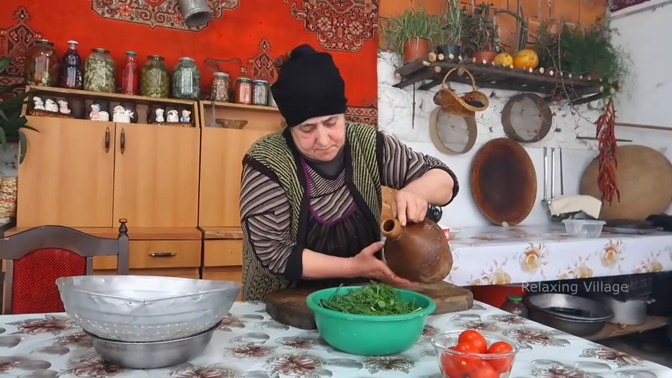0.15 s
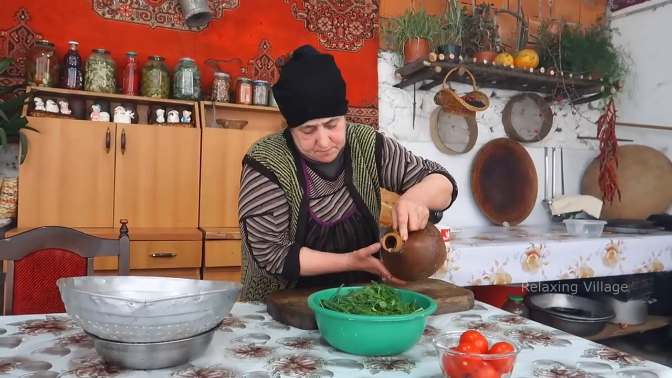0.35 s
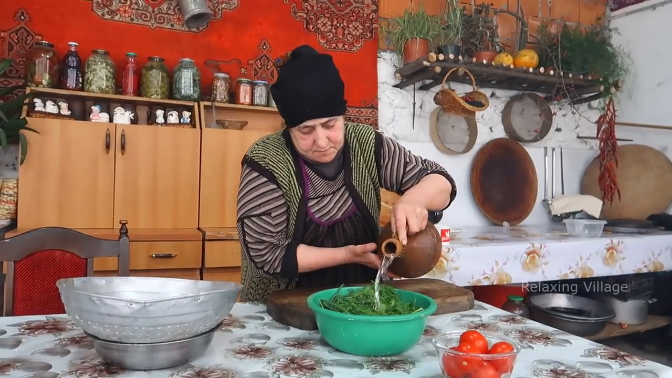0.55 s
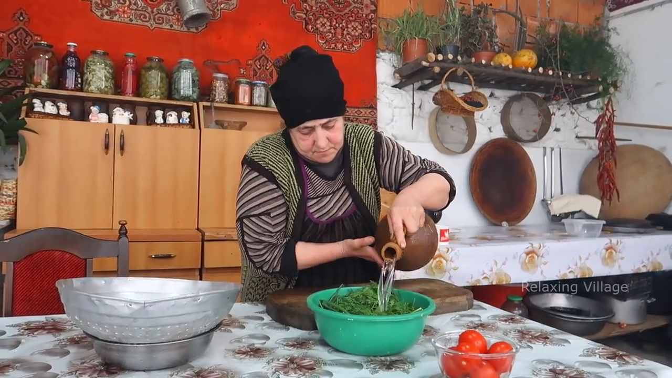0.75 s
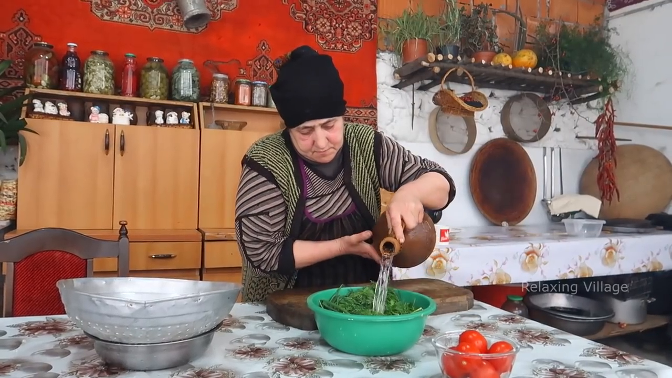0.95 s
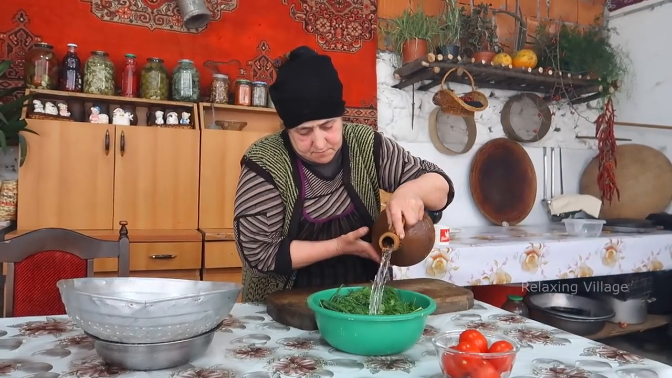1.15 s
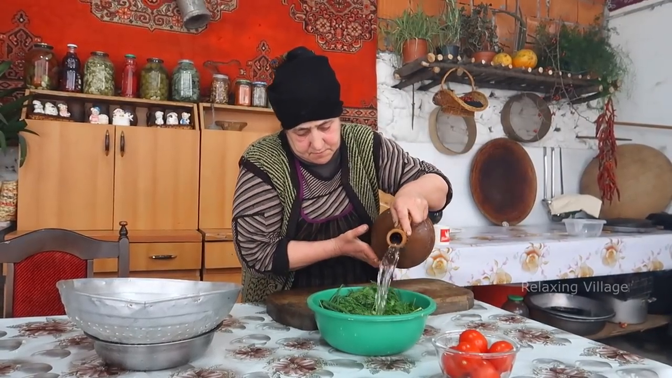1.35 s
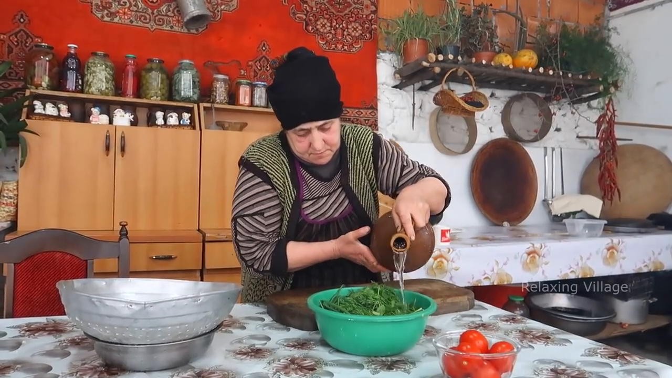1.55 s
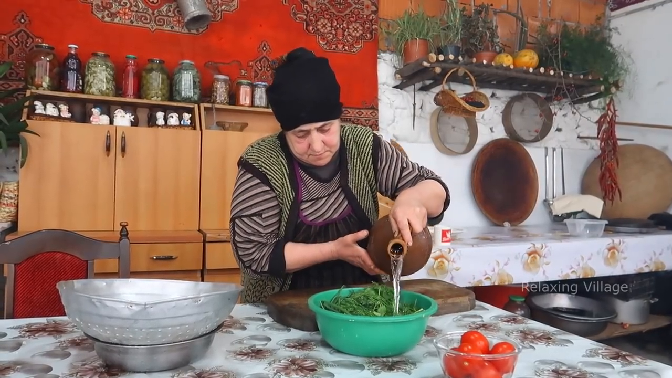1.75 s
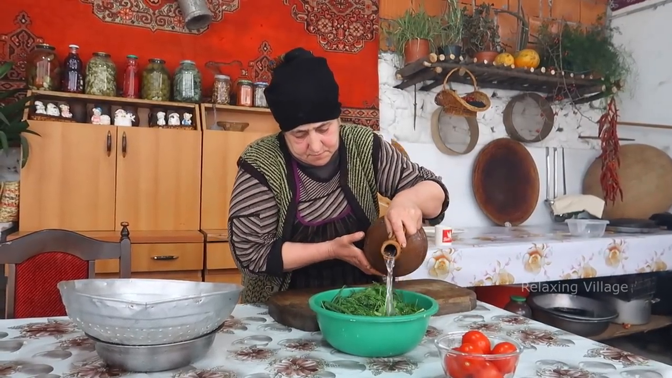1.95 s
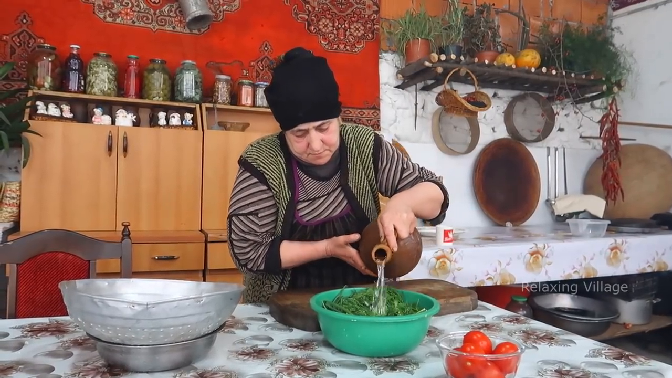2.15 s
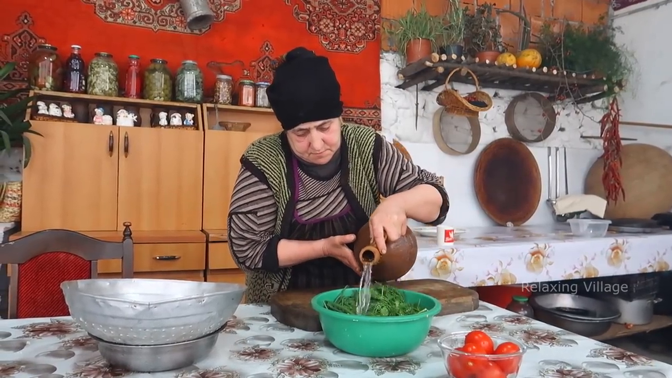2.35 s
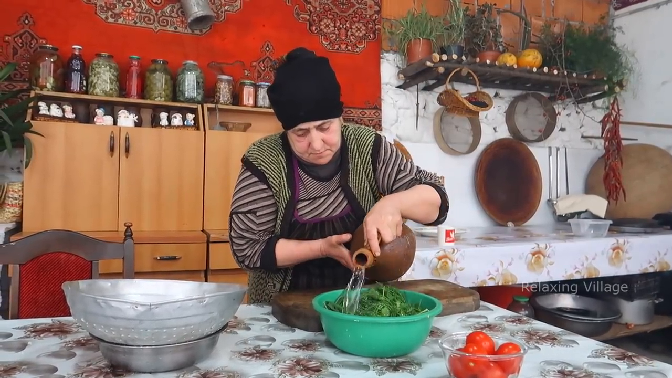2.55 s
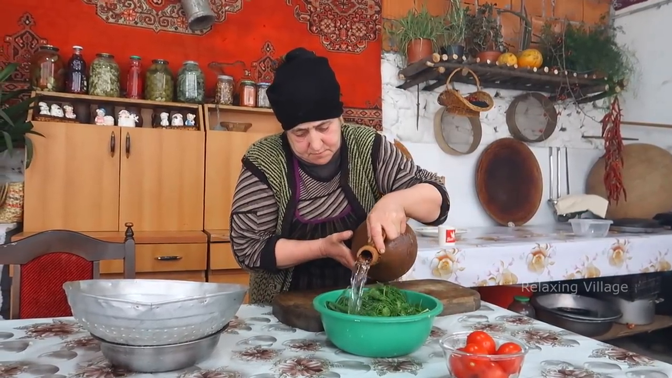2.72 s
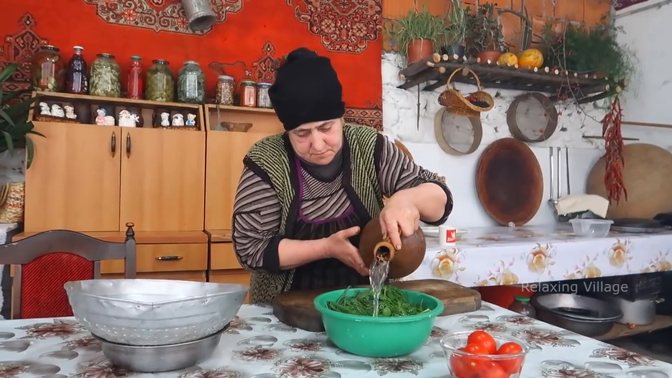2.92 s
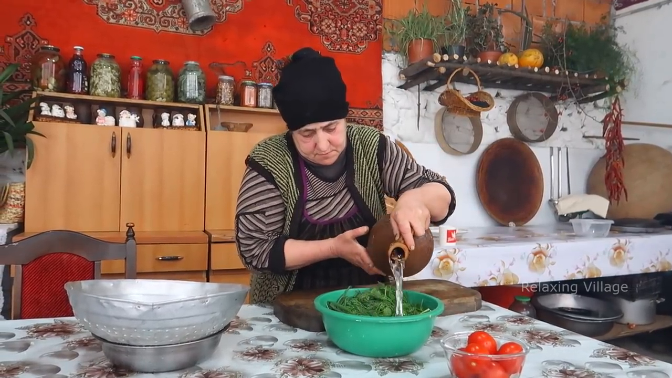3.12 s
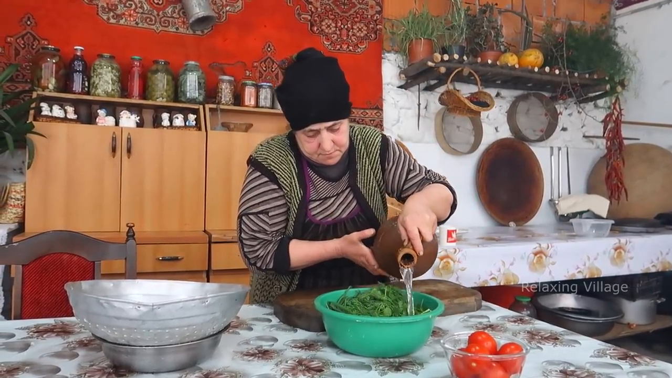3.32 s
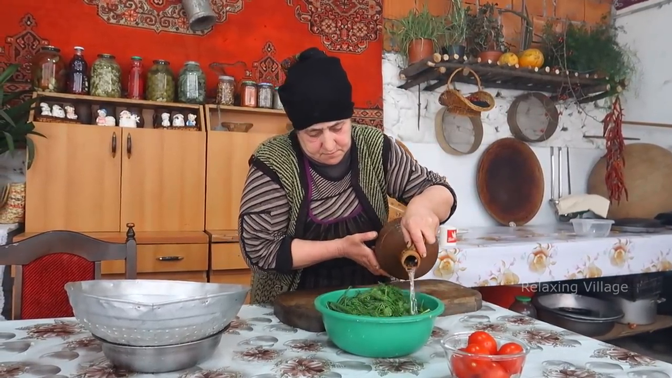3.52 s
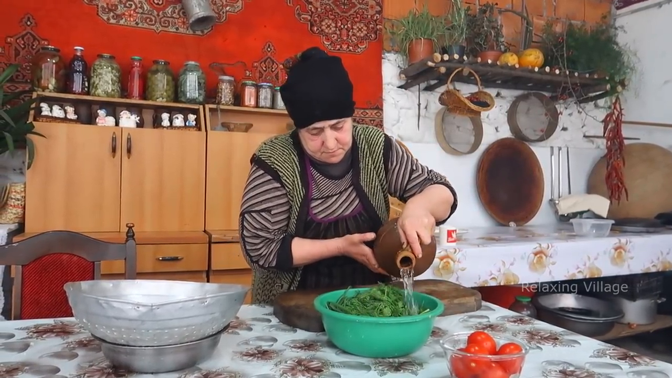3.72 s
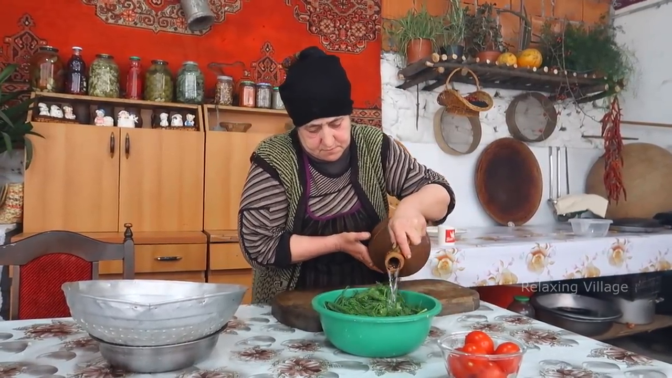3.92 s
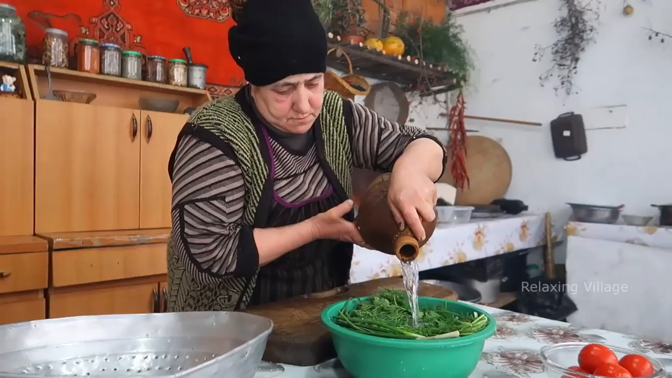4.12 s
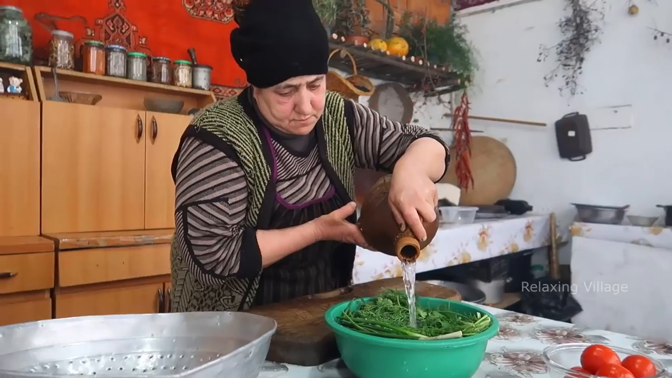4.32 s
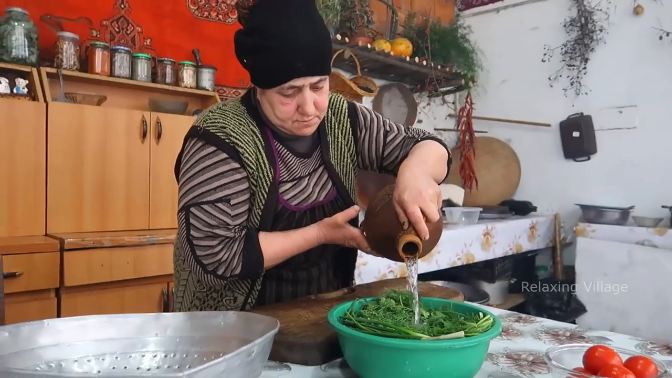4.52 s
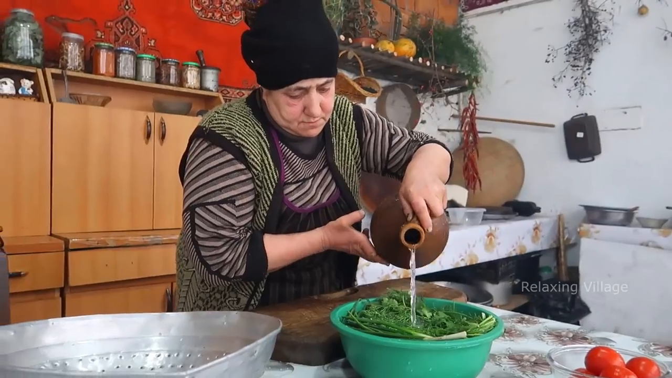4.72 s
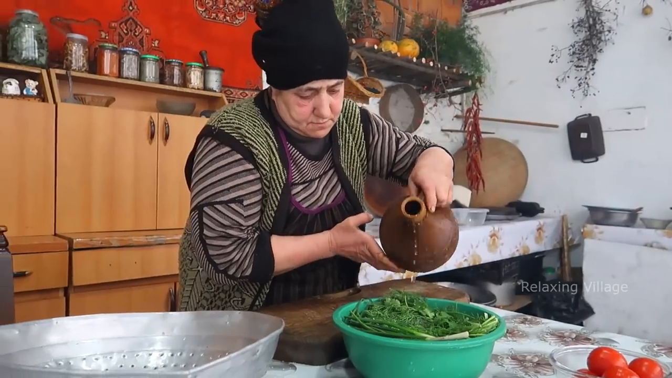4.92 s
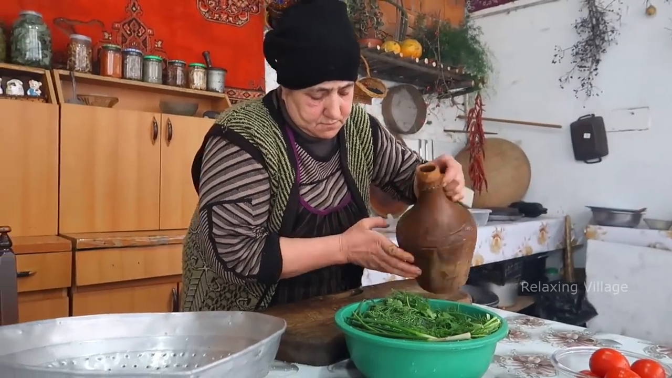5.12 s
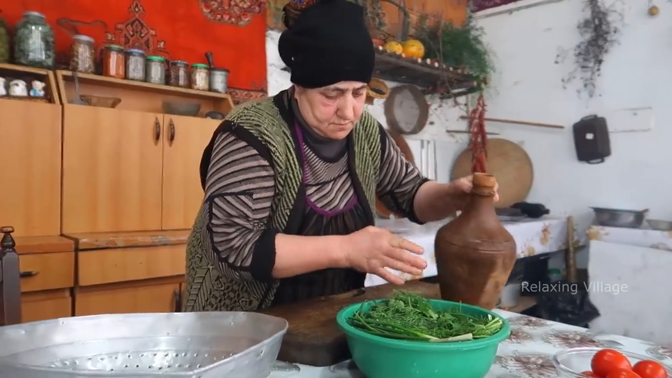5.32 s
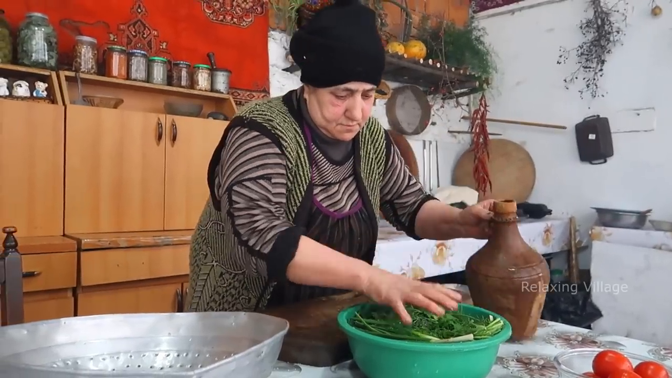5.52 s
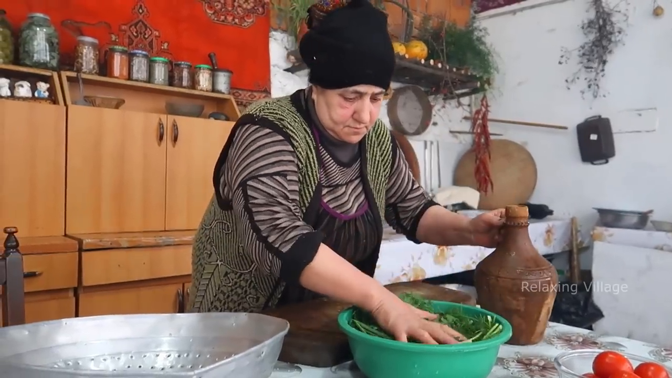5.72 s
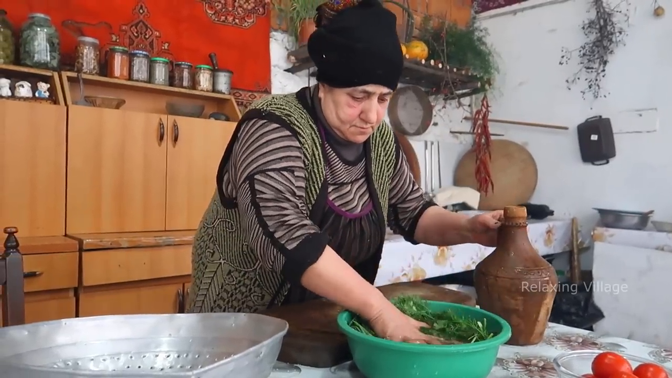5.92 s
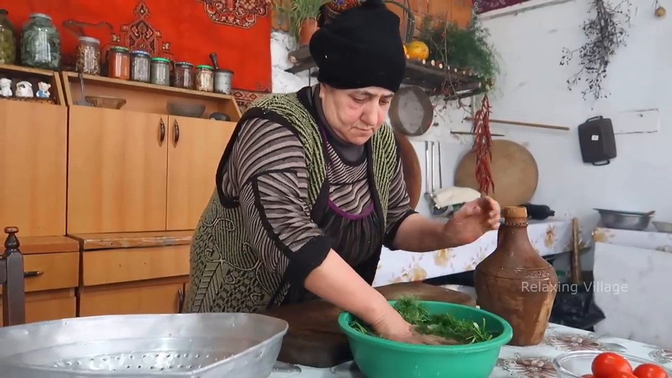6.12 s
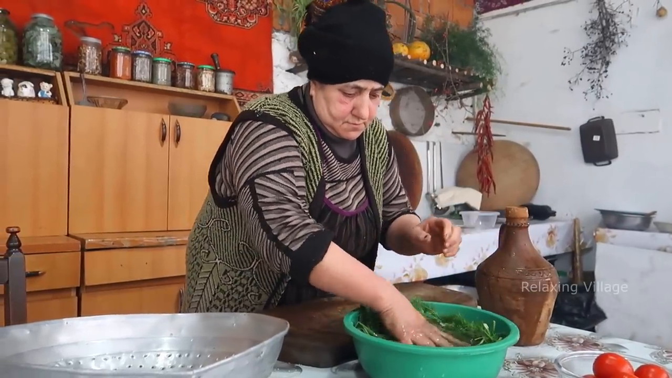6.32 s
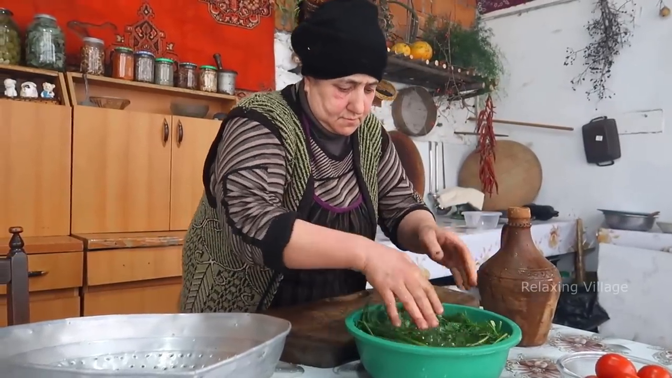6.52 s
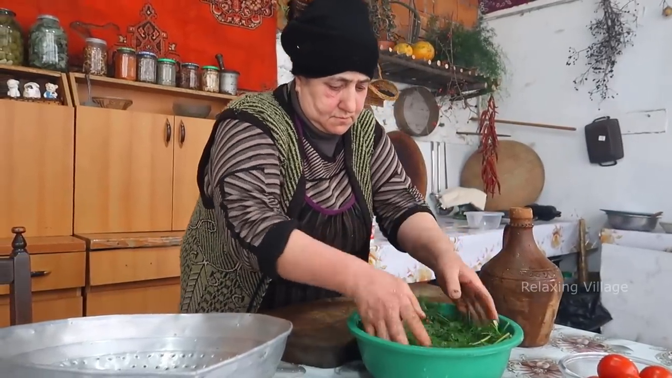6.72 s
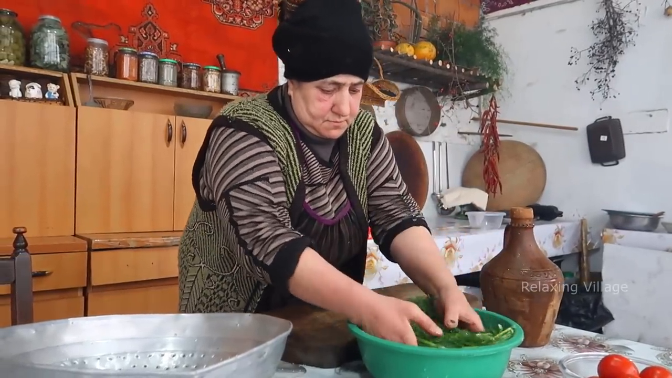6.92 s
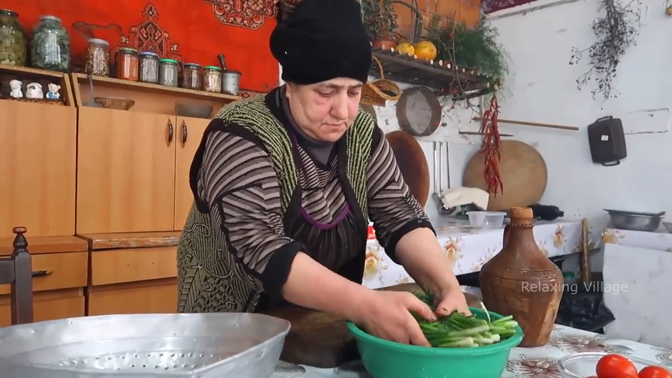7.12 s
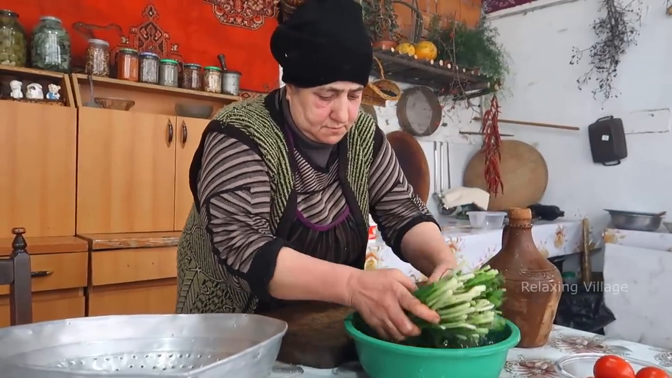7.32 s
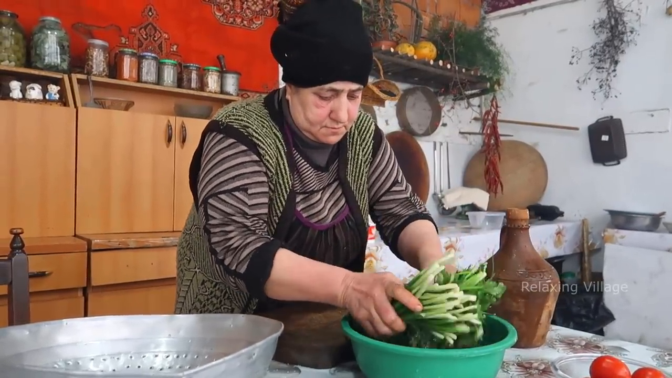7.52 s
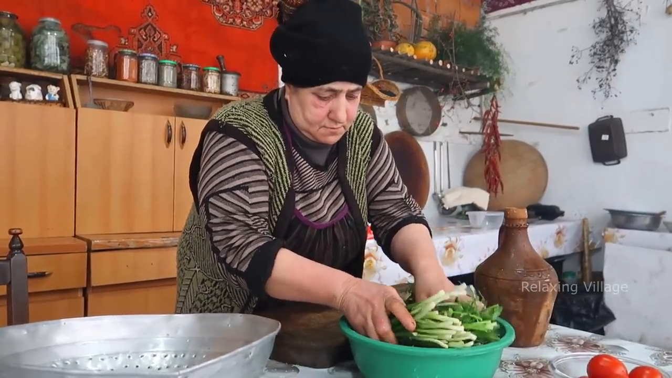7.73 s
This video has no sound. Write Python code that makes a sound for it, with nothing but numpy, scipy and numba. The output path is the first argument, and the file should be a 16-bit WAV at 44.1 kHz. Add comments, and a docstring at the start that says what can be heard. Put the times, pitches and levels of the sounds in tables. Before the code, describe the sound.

Over quiet room hiss, trapped air glugs about five times a second in a clay jug, with hollow pops strongest early and deeper booms later, while water patters on leaves. After a lull of small drips, one very loud thud of clay on a wooden table rocks and chatters. The level ducks, then wet rustles, dull bowl knocks, sloshing and a final burst of drops follow, closely miked.

```python
"""A faint pop in a jug's neck over kitchen hiss, then water glugs from clay onto greens in a plastic bowl.
Gulped air resonates in the belly, gurgles in the neck and pops as water films burst: damped oscillators.
Spurts and splashes are flurries of tiny bubble tones on the leaves. The jug lands hard on the table as
struck modes, then hands dunk the greens and lift them out streaming, as swelling drop clouds and noise.
Short room tails surround all sources, and loud moments push the overall level down for a while."""
import sys
import numpy as np
from scipy import signal
from scipy.fft import rfft, irfft, next_fast_len
from scipy.io import wavfile
from numba import njit

SR = 44100
rng = np.random.default_rng(int(sys.argv[2]) if len(sys.argv) > 2 else 0)


def log_audio(samples):
    """Write samples as a 16-bit WAV file to the path given in sys.argv[1]."""
    # one column per channel
    frames = np.atleast_2d(samples).T
    # limit to full scale, then quantise
    limited = np.clip(frames, -1, 1)
    pcm = np.round(limited * 32767).astype(np.int16)
    wavfile.write(sys.argv[1], SR, pcm)


N = 346626
T = np.arange(N) / SR

# Levels in the tables are relative: the functions set the final gain of each layer.
# air gulps entering the jug: start_s, boom_db, belly_pitch_hz, boom_t60_s, gurgle_db, gurgle_pitch_hz
AIR_GULPS = [(0.555, -31.5, 216, 0.036, -44.5, 456), (0.739, -33.5, 183.4, 0.29, -42, 398),
             (.924, -32, 176, 0.2, -35.5, 474), (1.132, -29, 176, 0.058, -42.5, 457),
             (1.345, -46, 185, 0.14, -40, 421), (1.638, -30, 128, 0.067, -28.5, 465),
             (1.882, -29.5, 194, 0.064, -39, 406), (2.09, -42, 113, 0.045, -44, 546),
             (2.324, -37, 133, 0.042, -34, 391), (2.523, -25.5, 122, 0.11, -56, 485),
             (2.782, -23.5, 153, 0.055, -33, 495), (3.022, -26.5, 213, 0.021, -38, 383),
             (3.2, -25.5, 144, 0.046, -28, 471), (3.412, -24.5, 163, 0.087, -30, 463),
             (3.665, -20.5, 147.4, 0.069, -30.5, 536), (3.855, -26.5, 149, 0.016, -31.5, 583),
             (4.039, -20.5, 148, 0.053, -30.5, 694)]
# deep hums growing before a bubble breaks free: peak_s, build_up_s, level_db, final_pitch_hz
BUBBLE_SWELLS = [(.585, .04, -48, 52), (.73, .13, -49, 72), (.9, .075, -41, 72), (1.122, .08, -43.5, 66),
                 (1.36, .085, -42.5, 62), (1.636, .022, -38.5, 62), (1.885, .03, -51, 52),
                 (2.106, .022, -44, 58), (2.328, .025, -45.5, 52), (2.522, .014, -36.5, 58),
                 (2.786, .017, -41.5, 56), (3.014, .026, -43.5, 58), (3.214, .014, -39, 58),
                 (3.43, .018, -41.5, 54), (3.681, .012, -36.5, 64), (3.864, .012, -39.5, 64),
                 (4.05, .012, -37.5, 64)]
# further gurgles in the neck, many close around a gulp, most sinking in pitch:
# start_s, level_db, pitch_hz, t60_s, glide_octaves
NECK_GURGLES = [(1.268, -32, 304, 0.059, -0.58), (1.846, -36, 534, 0.17, -1.7),
                (1.992, -41, 279, 0.079, -0.61), (2.074, -39.5, 740, 0.096, -0.12),
                (2.305, -29.5, 512, 0.069, -0.4), (2.335, -35.5, 380, 0.1, 0.16),
                (3.212, -30, 526, 0.074, -0.25), (3.424, -38.5, 724, 0.12, 0.2),
                (3.682, -32, 600, 0.08, 0.0041), (3.861, -27.5, 330, 0.038, -0.69)]
# pops of bursting water films in the neck, and the strongest rebounds of the ringing air:
# start_s, level_db, pitch_hz, snap_db, swell_cycles, t60_s, rebound_db
NECK_POPS = [(0.0742, -37.5, 1545, -57, .75, 0.024, -9), (.5605, -15.5, 1590, -27, 1.15, 0.016, -11),
             (0.5747, -25, 1665, -41, 3, 0.038, -14), (.584, -26.5, 1405, -52, 1.5, 0.025, -7),
             (0.7405, -31, 1860, -49.5, 0.86, 0.017, -14), (0.9234, -16, 1570, -43, 1.05, 0.031, -11.5),
             (0.933, -25, 1560, -67, 1.8, .028, -16), (0.9413, -21.5, 1576, -66, 2.5, 0.025, -13),
             (1.134, -24, 1627, -46, 0.81, 0.037, -14), (1.367, -38.5, 1640, -55, .75, 0.047, -12),
             (1.656, -29, 1770, -51, 2, 0.02, -15), (1.6632, -22, 1654, -47, 1.5, 0.019, -11.5),
             (1.668, -24, 1550, -50, 1.4, 0.033, -13), (1.712, -42, 1800, -67, 3, .035, -13),
             (1.8836, -30.5, 1634, -40, 0.72, 0.039, -14), (2.062, -46, 1795, -54, 4.4, 0.045, -6),
             (2.325, -45, 1650, -49, 1.1, 0.023, -5), (2.488, -47.5, 1700, -69, 2.2, 0.034, -12),
             (2.547, -46, 1750, -71, 3, 0.028, -2), (2.794, -38.5, 1700, -46.5, 2, 0.044, -3),
             (2.83, -43.5, 1750, -68, 3, 0.062, -8), (3.026, -39, 1630, -45, .75, 0.039, -1),
             (3.4142, -38.5, 1850, -67, 1.4, 0.027, -7), (3.469, -43.5, 1536, -70, 3, 0.043, -8),
             (3.703, -40, 1650, -56, 1.5, 0.025, -8), (3.887, -30, 1354, -60.5, 2, 0.023, -5),
             (3.898, -24, 1249, -58, 3.8, 0.039, -13), (4.045, -50, 1770, -59, 0.81, .033, -10)]
# spectrum of a bursting film's snap: frequency_hz, gain_db
SNAP_SPECTRUM = [(600, -25), (1400, 6), (2400, 11), (3200, 3), (4200, 5.5), (5300, 2.5), (8000, -4.5),
                 (11000, -17.5), (15000, -22)]
# water splashing into the bowl, from the jug and later off the greens:
# middle_s, spread_s, level_db, middle_pitch_hz
BOWL_SPLASHES = [(1.155, 0.027, -46.5, 3240), (1.58, 0.026, -53.5, 2600), (1.674, 0.018, -48, 2580),
                 (2.098, 0.046, -55, 2520), (2.96, 0.03, -44.5, 2390), (3.01, 0.041, -47.5, 2400),
                 (3.233, 0.047, -44, 2360), (3.425, 0.014, -46.5, 1145), (3.5, 0.039, -64.5, 1980),
                 (4.48, 0.027, -50, 2030), (4.615, 0.017, -51.5, 3230), (4.7, 0.05, -58, 3270),
                 (4.9, 0.031, -54, 2560), (5.15, 0.017, -50, 1940), (6.94, 0.061, -53, 1900),
                 (7.03, 0.018, -47.5, 1570), (7.70, .022, -44.5, 1550)]
# spectrum of spray on leaves: frequency_hz, gain_db
LEAF_SPRAY = [(700, 1), (1500, -4), (2300, -1), (4500, -0.5), (7000, 1), (11000, -12.5), (15000, -27)]
# the jug lands and rocks on its foot, and the table shudders and rebounds:
# start_s, level_db, contact_hardness_hz, lowest_shaken_hz, scuff_db, struck_spot_hz
JUG_AND_TABLE_KNOCKS = [(5.6955, 1.5, 714, 158, -6, 1110), (5.715, -9, 3930, 418, -17.5, 1800),
                        (5.723, -22, 4200, 110, -4.5, 150), (5.741, -16, 3800, 454, -12, 1520),
                        (5.748, -18, 3600, 450, -13, 1520), (5.757, -26.5, 4200, 593, -7, 1750),
                        (5.7813, -16, 3000, 900, -13, 1880), (5.786, -19.5, 1500, 600, -14, 930),
                        (5.809, -30, 3800, 300, -10, 1500), (5.826, -27.5, 3800, 350, -11, 1550),
                        (5.856, -27.5, 260, 150, -20, 202)]
# modes of the clay jug on the wooden table: pitch_hz, level_db, t60_s
JUG_MODES = [(124.2, -31.5, 0.97), (148.3, -8, 0.3), (190, 7.5, 0.057), (260, -1.5, 0.03),
             (440, -10.5, 0.039), (519, -2, 0.024), (632, -5.5, 0.038), (802, -11.5, 0.029),
             (933, -18, 0.074), (1245, -24.5, 0.23), (1514, -17, 0.073), (1780, -11, 0.03),
             (2190, -23, .06), (2960, -33, 0.12), (3420, -29.5, 0.08), (4090, -29, 0.22),
             (4759, -26, 0.074), (5240, -30, .13)]
# strokes of the hands (press, stir, plunge, gather, lift, drop back):
# peak_s, attack_s, release_s, spray_db, slosh_db, churn_db
HAND_STROKES = [(6.38, 0.024, 0.064, -67, -64, -50.5), (6.535, 0.03, 0.28, -53.5, -54, -65),
                (6.727, 0.018, .2, -53.5, -68, -64), (6.89, 0.18, 0.42, -52.5, -51, -46),
                (7.61, 0.55, 0.65, -47, -51, -49.5), (7.662, 0.043, 0.088, -37, -36, -47.5)]
# wet leaves and stalks brushing under the fingers: start_s, length_s, level_db, middle_pitch_hz
LEAF_RUSTLES = [(6.361, .075, -56, 3280), (6.516, 0.058, -53.5, 2310), (6.832, 0.12, -54.5, 2870)]
# hands bumping the full bowl: start_s, level_db
BOWL_BUMPS = [(6.268, -33.5), (6.723, -26.5), (6.776, -39), (6.834, -31.5), (7.09, -34.5)]
# the loudest drops and plops in the bowl, with two early ticks and a small knock:
# start_s, level_db, pitch_hz, t60_s
DRIPS_AND_TICKS = [(.372, -45.5, 5800, .008), (.449, -41, 7840, 0.0054), (1.522, -40.5, 970, 0.032),
                   (1.575, -45, 2620, 0.029), (1.584, -46, 2040, .02), (2.932, -37, 4200, .01),
                   (2.946, -38, 2270, 0.036), (2.968, -41, 2200, .035), (2.971, -41, 1650, .015),
                   (2.993, -46, 4450, .012), (3.108, -43, 4220, .016), (3.197, -36, 2010, .025),
                   (3.219, -40, 3300, .012), (3.246, -43, 2670, 0.017), (3.274, -41, 2120, .02),
                   (3.863, -42.5, 6130, 0.02), (4.437, -37.5, 4220, .016), (4.468, -39, 1750, .012),
                   (4.497, -43, 2300, .012), (4.931, -43, 5640, 0.017), (5.148, -42, 2000, .025),
                   (6.48, -38, 3320, 0.012), (6.522, -38, 4300, 0.011), (6.523, -49, 3100, 0.0097),
                   (6.537, -36, 2020, 0.024), (6.566, -44, 4960, 0.014), (6.628, -39, 2820, 0.01),
                   (6.721, -34, 2660, 0.017), (6.723, -33, 714, 0.041), (6.877, -39, 3350, 0.017),
                   (6.910, -33, 687, 0.028), (7.019, -41, 1170, 0.013), (7.360, -29, 700, .036),
                   (7.417, -50, 3460, 0.016), (7.444, -36, 2093, 0.07), (7.445, -37, 2900, 0.027),
                   (7.456, -39, 2990, 0.066), (7.506, -37, 710, 0.03), (7.52, -33.5, 1840, 0.03),
                   (7.524, -38, 3360, 0.018), (7.545, -33, 1980, 0.018), (7.5452, -37, 4140, .01),
                   (7.560, -36, 3600, 0.013), (7.584, -28, 2860, .011), (7.585, -31.5, 3460, 0.018),
                   (7.606, -37, 2830, .018), (7.608, -30, 3340, .014), (7.640, -30.5, 1310, .025),
                   (7.654, -33, 1350, .02), (7.656, -28.5, 696, 0.05), (7.657, -33, 4100, .012),
                   (7.664, -40, 1990, 0.016), (7.665, -36, 5000, .012), (7.668, -32, 1140, .022),
                   (7.672, -33, 4250, 0.015), (7.673, -35, 4850, .014), (7.678, -31, 4130, 0.017),
                   (7.679, -30, 1400, .018), (7.693, -33, 3420, .016), (7.697, -30, 1680, 0.022),
                   (7.709, -38, 1390, .022), (7.741, -37, 1300, .02), (7.726, -27, 980, 0.027),
                   (7.772, -28.5, 940, 0.026), (7.804, -35, 860, .025)]
# first reflections from table, cupboard and wall: delay_s, level_db
FIRST_REFLECTIONS = [(.0052, -30), (0.0112, -16), (0.018, -16.5)]
# gain of the side signal, which sets two close microphones apart: frequency_hz, gain_db
SIDE_GAIN = [(120, -32), (300, -14.5), (700, -16.5), (1400, -16.5), (2800, -16.5), (5600, -13.5),
             (10000, -8.5)]
# spectrum of the kitchen background: frequency_hz, density_db_per_hz
KITCHEN_SPECTRUM = [(15, -52), (25, -15), (49, -6), (122, -4), (140, -7), (266, -4.5), (322, -19.5),
                    (410, -7), (508, -15), (942, -13.5), (1110, -19), (1340, -16.5), (4250, -21),
                    (11500, -38.5), (15400, -53)]
# faint appliance drone and whines: start_s, end_s, pitch_hz, bandwidth_hz, level_db
APPLIANCE_TONES = [(0, 7.14, 280, 41, -60), (0, 3.85, 2850, 120, -68), (3.6, 6.6, 2595, 109.5, -65),
                   (4.9, 8.9, 1302, 39.7, -67.5)]

# main gurgles shorten from the full jug to the end of the glugging
GLUGGING_SPAN_S, GURGLE_T60_S = (.55, 4.05), (0.099, 0.051)
GURGLE_LAG_S, GURGLE_GLIDE_OCT = 0.00083, 0.24
SWELL_START_HZ, SWELL_RELEASE_S = 35.8, 0.014
# water sloshing in the neck restarts the ring and bends its pitch
REBOUND_POP_S, WOBBLE_HZ, WOBBLE_OCT = 0.0085, 64.8, 0.1
# shreds of a film: how long they go on bursting, their pitch scatter and sinking
SHRED_S, SHRED_OCT, SHRED_SAG_OCT = .08, .29, .06
# water let go after each pop: a harder snap throws more of it
SPURT_LAG_S, SPURT_SPREAD_S, SPURT_HZ = 0.027, .033, 2720
SPURT_DB, SPURT_DB_PER_SNAP_DB = -39, 0.43
# each knock favours the modes near the pitch of its spot
SPOT_DB, SPOT_OCT = 6.5, 0.16
# tiny slips of the foot as the jug settles
CHATTER_DB, CHATTER_S = -23.5, 0.13
BOWL_HZ, BOWL_REBOUND_S, BOWL_REBOUND_DB = 133.6, .033, -3.5
STROKE_RANGE_DB = 20  # change of level over one attack or release time
TOP_HZ = 15500  # upper edge of the output band


def undb(db):
    """Level law: decibels to an amplitude ratio."""
    return 10 ** (np.asarray(db) / 20)


def unit(x):
    """Normalization to a root mean square of 1."""
    return x / np.sqrt(np.mean(x ** 2) + 1e-20)


def add(track, s, sound):
    """Superposition: mix a sound into a track at time s."""
    i = int(np.clip(s * SR, 0, N - 1))
    track[i:i + len(sound)] += sound[:N - i]


def colour(x, points):
    """Linear filtering by a smooth outline of frequency_hz, gain_db."""
    hz, db = np.transpose(points)
    f = np.arange(len(x) // 2 + 1) * SR / len(x)
    gain = undb(np.interp(np.log(f + 1), np.log(hz), db))
    return irfft(rfft(x) * gain, len(x))


def noise(points):
    """Spectral shaping of Gaussian noise by frequency_hz, level_db; rms 1."""
    hz, db = np.transpose(points)
    f = np.arange(N // 2 + 1) * SR / N
    gain = undb(np.interp(np.log(f + .01), np.log(hz), db, left=-200))
    return unit(irfft(gain * rfft(rng.standard_normal(N)), N))


def roll_off(x, hz, kind, order=2):
    """Causal Butterworth low-pass or high-pass."""
    return signal.sosfilt(signal.butter(order, hz, kind, fs=SR, output="sos"), x)


def ring(hz, t60, glide=0, rise=0, wobble=0):
    """Damped oscillation: swells over `rise` cycles, slides `glide` and wavers by `wobble` octaves."""
    t = np.arange(int(t60 * SR) + 2) / SR
    bend_oct = glide * t / t60 + wobble * np.sin(2 * np.pi * WOBBLE_HZ * t)
    phase = 2 * np.pi * np.cumsum(hz * 2 ** bend_oct) / SR
    decay = np.exp(-np.log(1000) * t / t60)
    onset = 1 - np.exp(-(t * hz + 1e-6) / (rise + 1e-9))
    return np.sin(phase) * decay * onset


def burst(t60):
    """Exponential decay of a puff of noise, one second long."""
    return rng.standard_normal(SR) * np.exp(-np.log(1000) * T[:SR] / t60)


def droplets(length, hz, octaves, rate, cycles, spread_db, tick_db):
    """Bubble resonance in a cloud of drops, few of them loud: an impact tick, then a rising tone; rms 1."""
    out = np.zeros(N)
    for when, a, b, life, luck in rng.random((int(rate * length) + 1, 5)):
        pitch = min(hz * 2 ** (octaves * (a - b)), SR / 3)
        drop = ring(pitch, cycles * (.5 + life) / pitch, glide=0.2, rise=0.37)
        drop[:2] += undb(tick_db) * np.array([1, -1])
        add(out, when * length, undb(-spread_db * np.log(luck + 0.064)) * drop)
    return unit(out[:int(length * SR)])


def glugs():
    """Cavity resonance: the trapped air bounces on the water as each gulp enters, and the neck gurgles."""
    belly, neck = np.zeros(N), np.zeros(N)
    for s, db, hz, t60, gurgle_db, gurgle_hz in AIR_GULPS:
        add(belly, s, -undb(db) * ring(hz, t60, glide=-0.044, rise=0.071))
        # the water slaps back
        add(belly, s + 0.01684, -undb(db - 5.5) * ring(hz * 1.337, t60=0.04, rise=0.03))
        for late, size in rng.random((6, 2)):  # the bubble breaks into smaller ones
            fragment = ring(220 * 4.07 ** size, t60=0.023, rise=0.57)
            add(neck, s + 0.023 * late, undb(db - 23) * fragment)
        gurgle_t60 = np.interp(s, GLUGGING_SPAN_S, GURGLE_T60_S)
        gurgle = ring(gurgle_hz, gurgle_t60, GURGLE_GLIDE_OCT, rise=0.32, wobble=0.069)
        add(neck, s + GURGLE_LAG_S, undb(gurgle_db) * gurgle)
        for late, size in rng.random((3, 2)):  # weaker gurgles follow the main one
            weaker = ring(gurgle_hz * 2 ** (0.77 * (size - .65)), t60=0.04, rise=0.57)
            add(neck, s + .025 * late, undb(gurgle_db - 8.0) * weaker)
    for s, build_s, db, hz in BUBBLE_SWELLS:
        add(belly, s - 4 * build_s, undb(db - 1.5) * swell(build_s, hz))
    for s, db, hz, t60, glide in NECK_GURGLES:
        add(neck, s, undb(db) * ring(hz, t60, glide, rise=2.7, wobble=0.057))
    return undb(1.0) * belly + neck


def swell(build_s, hz):
    """Exponential growth: a deep hum climbs in pitch, then stops as the bubble breaks free."""
    length = int((4 * build_s + 3 * SWELL_RELEASE_S) * SR)
    t = T[:length] - 4 * build_s  # the peak lies at t = 0
    growth = np.exp(np.minimum(t, 0) / build_s)
    phase = 2 * np.pi * np.cumsum(SWELL_START_HZ + (hz - SWELL_START_HZ) * growth) / SR
    release = np.exp(-(np.maximum(t, 0) / SWELL_RELEASE_S) ** 2)
    return np.sin(phase) * growth * release


def pops():
    """Air-column resonance: snapping films ring the short neck; sloshing water makes it rebound and waver."""
    tone, snap = np.zeros(N), np.zeros(N)
    for s, db, hz, snap_db, swell_cycles, t60, rebound_db in NECK_POPS:
        add(tone, s, undb(db + 4.0) * ring(hz, t60, glide=0.043, rise=swell_cycles, wobble=0.025))
        add(tone, s, undb(snap_db + 2.5) * ring(hz * 2.63, t60=0.015))  # weak overtone
        add(snap, s, undb(snap_db + 8.0) * burst(t60=0.015))
        for k, (late, size, bend) in enumerate(rng.uniform(-1, 1, (2, 3)), 1):
            again = ring(hz * 2 ** (.12 * size), t60=0.02, rise=1.4, wobble=WOBBLE_OCT * bend)
            again_db = db + rebound_db + 8.5 - 1.5 * k
            add(tone, s + REBOUND_POP_S * (k + 0.145 * late), undb(again_db) * again)
        for late, size, bend in rng.random((12, 3)):  # later shreds are weaker and tend lower
            shift_oct = SHRED_OCT * (2 * size - 1) - SHRED_SAG_OCT * late
            shred = ring(hz * 2 ** shift_oct, t60=0.013, rise=1.1, wobble=WOBBLE_OCT * (2 * bend - 1))
            add(tone, s + .006 + SHRED_S * late, undb(db - 11.5 - 12 * late) * shred)
        for late, size in rng.random((9, 2)):  # flung droplets
            drop = ring(1900 * 2.4 ** size, t60=0.0048, rise=0.72)
            add(snap, s + 0.0056 + .07 * late, undb(db - 28.0 - 27 * late) * drop)
    return tone + colour(snap, SNAP_SPECTRUM)


def pour():
    """Bubble resonance in bulk: a thin stream patters on leaves; spurts and splashes add flurries."""
    out = np.zeros(N)
    stream = droplets(length=4.9, hz=3814, octaves=2.09, rate=600, cycles=38, spread_db=9.5, tick_db=7.0)
    add(out, .6, undb(-61.0) * stream)
    spurts = []
    for s, _, _, snap_db, *_ in NECK_POPS:
        spurt_db = SPURT_DB + SPURT_DB_PER_SNAP_DB * snap_db
        spurts.append((s + SPURT_LAG_S, SPURT_SPREAD_S, spurt_db, SPURT_HZ))
    for s, spread, db, hz in spurts + BOWL_SPLASHES:
        flurry = droplets(4 * spread, hz, octaves=1.295, rate=1400, cycles=24, spread_db=3.0, tick_db=3.5)
        add(out, s - 2 * spread, undb(db + 0.5) * flurry * np.hanning(len(flurry)))
    return colour(out, LEAF_SPRAY)


def set_down():
    """Modal excitation: a dull, heavy blow; the foot rocks and chatters, the table shudders and rebounds."""
    out = np.zeros(N)
    for k, (s, db, hard_hz, low_hz, scuff_db, spot_hz) in enumerate(JUG_AND_TABLE_KNOCKS):
        body = np.zeros(N)
        # modes vary at random from knock to knock, except in the first
        variations = rng.standard_normal((len(JUG_MODES), 2)) * (k > 0)
        for (hz, mode_db, t60), (chance, load) in zip(JUG_MODES, variations):
            favour_db = SPOT_DB * np.exp(-(np.log2(hz / spot_hz) / SPOT_OCT) ** 2)
            mode = ring(hz * (1 + 0.0215 * load), t60, rise=0.19)
            add(body, 0, undb(mode_db + favour_db + 2 * chance) * mode)
        # gritty clay scuffs the wood
        add(body, 0, undb(scuff_db) * roll_off(burst(t60=0.06), 820, "high"))
        knock = roll_off(roll_off(body[:SR], hard_hz, "low"), low_hz, "high")
        add(out, s, undb(db) * knock)
    for late, size in rng.random((34, 2)):
        slip = ring(600 * 7.5 ** size, t60=.012, rise=0.42)
        slip_db = CHATTER_DB - 20 * late - 6.3 * size
        add(out, JUG_AND_TABLE_KNOCKS[1][0] + CHATTER_S * late, undb(slip_db) * slip)
    # the whole table gives under the weight
    add(out, JUG_AND_TABLE_KNOCKS[0][0], undb(-18.0) * ring(hz=45, t60=0.089, rise=0.073))
    return roll_off(out, 7100, "low", order=4)


def washing():
    """Bubble and bowl resonance: hands brush, bump and churn, greens stream; drips and ticks span the scene."""
    start = HAND_STROKES[0][0] - .5
    length = N / SR - start
    spray, slosh, churn = stroke_levels()
    fine, coarse, drops = np.zeros((3, N))
    add(fine, start, droplets(length, hz=2740, octaves=1.55, rate=1300, cycles=18, spread_db=3.5, tick_db=6.0))
    add(coarse, start, droplets(length, hz=1093, octaves=1.36, rate=1100, cycles=19, spread_db=4.0, tick_db=-16))
    # single larger drops
    add(drops, start, droplets(length, hz=3144, octaves=1.13, rate=74, cycles=60, spread_db=0.5, tick_db=-9))
    out = spray * (undb(0.5) * colour(fine, LEAF_SPRAY) + undb(-7.5) * drops)
    out += undb(-1) * slosh * roll_off(coarse, 590, "high", order=4)
    out += undb(-2.0) * churn * noise([(30, -8), (100, -1.0), (220, 2), (400, -11.0), (1000, -66)])
    for s, span, db, hz in LEAF_RUSTLES:
        crackle = droplets(span, hz, octaves=0.81, rate=1300, cycles=13, spread_db=6.0, tick_db=-23)
        envelope = np.interp(T[:len(crackle)] / span, [0, .15, 1], [.3, 1.3, .3])
        add(out, s, undb(db) * crackle * envelope)
    for s, db in BOWL_BUMPS:
        for k in range(3):  # the bowl rocks back, weaker each time
            bump = ring(BOWL_HZ, t60=0.068, rise=0.25)
            add(out, s + k * BOWL_REBOUND_S, undb(db + k * BOWL_REBOUND_DB) * bump)
    for s, db, hz, t60 in DRIPS_AND_TICKS:
        add(out, s, undb(db + 0.5) * ring(hz, t60, glide=0.046, rise=0.7))
        add(out, s, undb(db - 3) * ring(hz * 1.4, t60=0.0027, rise=0.23))  # impact
    return out


def stroke_levels():
    """Power summation: spray, slosh and churn swell with each stroke and die away after it."""
    power = np.zeros((3, N))
    for s, attack, release, *dbs in HAND_STROKES:
        distance = np.maximum((s - T) / attack, (T - s) / release)
        envelope = undb(-STROKE_RANGE_DB * np.minimum(distance, 10))
        power += np.outer(undb(dbs), envelope) ** 2
    return np.sqrt(power)


def stereo(mid, side):
    """Sum and difference of mid and side: two close microphones, alike in the bass, apart in the treble."""
    padded = np.pad(side, (0, next_fast_len(N, True) - N))
    return mid + np.array([[1], [-1]]) * colour(padded, SIDE_GAIN)[:N]


def room(x, wet_db, t60):
    """Reverberation: near reflections, then a diffuse tail whose bass and upper band decay separately."""
    def tail():
        """Diffuse field: convolution with decaying noise of unit energy."""
        bass = undb(-2.0) * roll_off(burst(t60=0.34), 260, "low")
        upper = roll_off(roll_off(burst(t60), 202, "high"), 4160, "low", order=1)
        decay = (bass + upper) * np.clip(T[:SR] / 0.0042 - .3, 0, 1)
        return undb(wet_db) * signal.oaconvolve(x, decay / np.sqrt(np.sum(decay ** 2)))[:N]
    near, dull = x.copy(), roll_off(x, 7200, "low", order=1)
    for delay, db in FIRST_REFLECTIONS:
        add(near, delay, undb(db) * dull)
    left, right = stereo(near + tail(), tail())
    # the sources are a little nearer the right: left is softer and one sample late
    return np.array([undb(-0.95) * np.roll(left, 1), right])


def background():
    """Stationary noise and narrow-band resonance: kitchen hiss wavers a little under faint appliance tones."""
    waver = noise([(.3, -3.0), (8, 2), (30, -29.0), (100, -120)])
    mid = undb(-53.5 + .5 * waver) * noise(KITCHEN_SPECTRUM)
    for t0, t1, hz, width, db in APPLIANCE_TONES:
        tone = signal.lfilter(*signal.iirpeak(hz, hz / width, SR), rng.standard_normal(N))
        fade = np.interp(T, [t0 - .3, t0, t1, t1 + 0.31], [0, 1, 1, 0])
        mid += undb(db) * unit(tone) * fade
    return stereo(mid, undb(-40) * noise(KITCHEN_SPECTRUM))


def scene():
    """Superposition of the sources, each in its own reverberation, over the background."""
    jug = room(glugs(), wet_db=-14.0, t60=0.21) + room(pops(), wet_db=-11.0, t60=0.34)
    water = room(pour() + washing(), wet_db=-11.5, t60=0.38)
    knocks = room(set_down(), wet_db=-15, t60=0.47)
    return jug + water + knocks + background()


@njit
def follow(x, attack, release):
    """Envelope detection by one-pole smoothing: quick to rise, slow to fall."""
    out, e = np.empty(len(x)), 0.
    for i in range(len(x)):
        e += (x[i] - e) * (attack if x[i] > e else release)
        out[i] = e
    return out


def record(dry, attack_s=0.021, release_s=1.0, threshold_db=-18.0):
    """Dynamic compression: loud sound ducks the level, which creeps back; excess peaks clip; treble is cut."""
    envelope = follow(np.abs(dry).max(axis=0), 1 / (attack_s * SR), 1 / (release_s * SR))
    excess = np.maximum(envelope / undb(threshold_db), 1)
    held = np.clip(dry / excess ** 0.85, -1, 1)
    return signal.sosfilt(signal.ellip(8, .2, 70, TOP_HZ, fs=SR, output="sos"), held)


dry = scene()
out = record(dry)
log_audio(out)
```